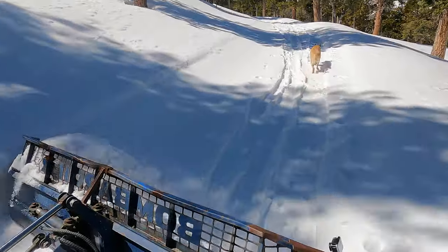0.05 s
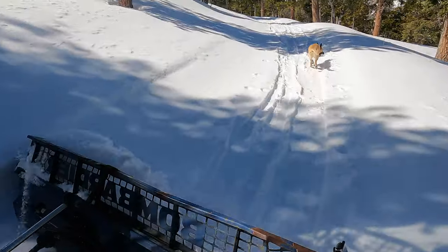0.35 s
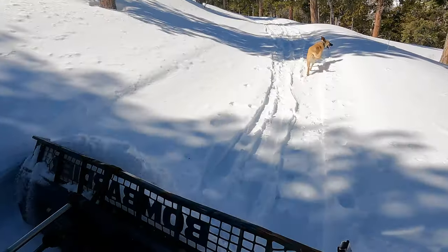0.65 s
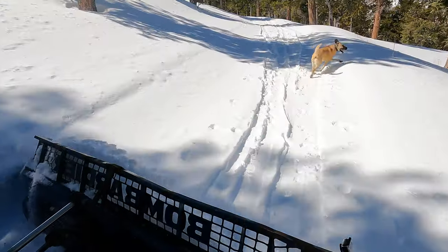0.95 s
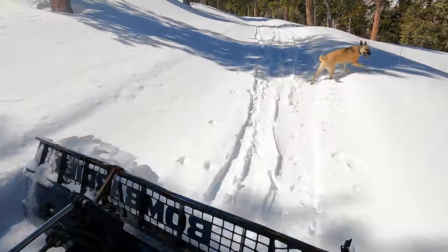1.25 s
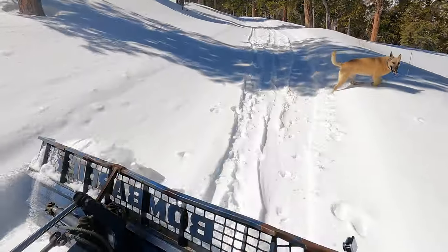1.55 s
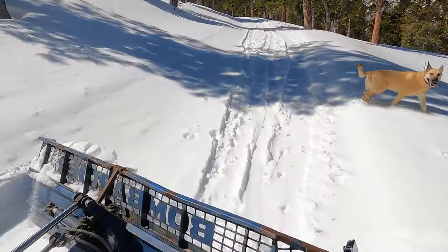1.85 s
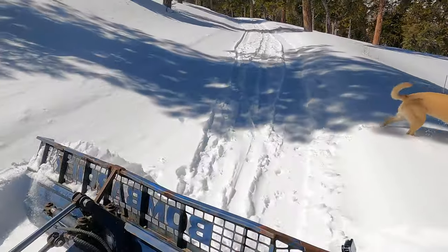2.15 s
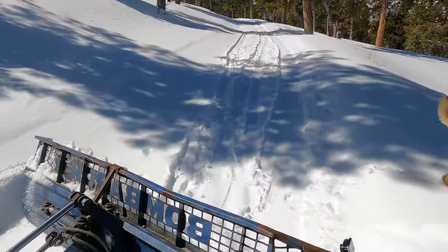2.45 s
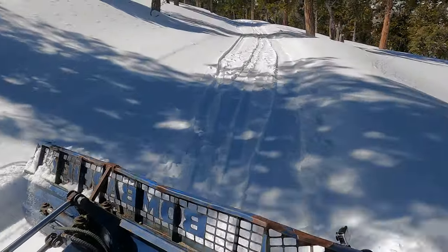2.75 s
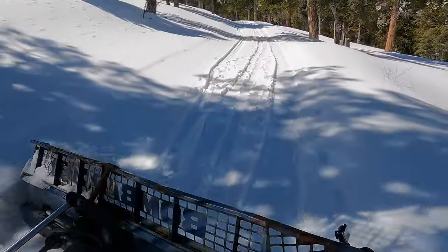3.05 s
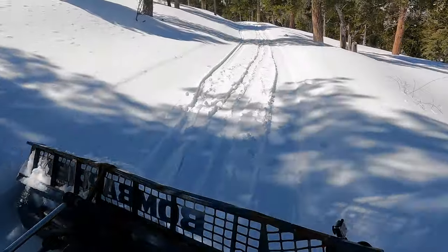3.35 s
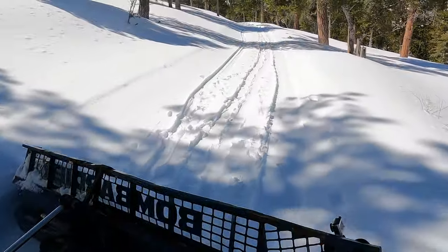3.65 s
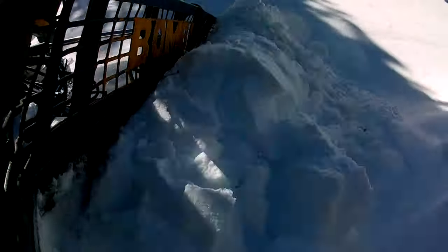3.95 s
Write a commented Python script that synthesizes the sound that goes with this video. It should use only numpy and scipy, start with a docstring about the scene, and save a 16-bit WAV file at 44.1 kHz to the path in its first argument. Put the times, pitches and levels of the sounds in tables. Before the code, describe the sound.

A tracked snow vehicle drones and clatters along, ending in a brief, loud, distorted throb.

```python
"""A snowy trail, on board a crawling snowcat. The exhaust drones at the firing rate, valves and injectors
clatter, gears whine and the engine covers ring. Track cleats drum over the sprockets and shake the
chassis, wheels squeak, loose steel clinks, and snow hisses and cracks under the tracks.
Near the end the sound cuts to a spot right beside the track, where a low throb, churning and creaking
snow overload a mono microphone."""
import sys
import numpy as np
from scipy import signal
from scipy.fft import rfft, irfft
from scipy.io import wavfile
from scipy.ndimage import uniform_filter1d, map_coordinates

SR = 44100
rng = np.random.default_rng(int(sys.argv[2]) if len(sys.argv) > 2 else 0)


def materialize(psi):
    """Save the field psi as 16-bit PCM at rate SR to the path in sys.argv[1].

    A 1-D psi becomes a single channel; in a 2-D psi each row is a channel.
    """
    bounded = np.clip(np.atleast_2d(psi).T, -1, 1)
    quanta = np.round(bounded * 32767).astype(np.int16)
    wavfile.write(sys.argv[1], SR, quanta)


N = 176400
T = np.arange(N) / SR
CYLINDERS = 6  # firings per four-stroke cycle


def exhaust(cycle):
    """The firing cylinders make a strong, steady drone with weaker tones around it."""
    # exhaust and body overtones (multiple of the engine cycle rate, level [dB])
    orders = [(7, -35.5), (9, -39), (10, -35), (12, -33), (14, -38.5), (16, -33.5), (17, -38), (18, -35.5),
              (22, -36.5), (26, -41), (33, -36)]
    drone = tones(cycle, [(CYLINDERS, -16)], waver_db=.44, smear_rad=.11)
    return drone + tones(cycle, orders, waver_db=2.5, smear_rad=.53)


def track_drum(cleat):
    """Cleats drum over the sprockets; the chassis rumbles and booms at twice their rate."""
    # drumming tones (multiple of the cleat rate, level [dB])
    drum_tones = [(1, -28), (3, -33.5)]
    # swells of the chassis boom (time [s], level [dB])
    boom_level = [(0, -36), (.12, -23), (.3, -17.5), (.44, -27), (1.0, -26), (1.4, -25.5), (1.9, -34),
                  (2.2, -19), (2.38, -34), (2.7, -29), (3.3, -26.5), (3.7, -26)]
    # chassis rumble spectrum (frequency [Hz], relative level [dB])
    rumble_eq = [(12, -8), (38, 1.5), (75, 3.5), (110, -0.5), (170, -6.5), (270, -4), (400, -10.5),
                 (800, -18.5)]
    drum = tones(cleat, drum_tones, waver_db=2.5, smear_rad=.077)
    boom = undb(curve(boom_level)) * tones(cleat, [(2, 0)], waver_db=.5, smear_rad=.2)
    rumble = stereo(colour(rng.standard_normal((2, N)), rumble_eq), spread=.13, pan_db=-1.3)
    return drum + boom + undb(-21) * rumble


def clatter(cycle, repeat_share=.34, knocks_per_cycle=10):
    """Valves and injectors rattle, partly alike on every cycle, in alternately strong and weak knocks."""
    # clatter spectrum (frequency [Hz], relative level [dB])
    clatter_eq = [(200, -6.5), (300, -9), (420, -5), (600, 0.5), (860, -3.5), (930, 0), (1150, 1.5),
                  (1500, -1.5), (1850, -1.5), (2100, -5.5), (2600, -5.5), (3000, -10.5), (3900, -18),
                  (7000, -26.5), (13000, -42)]
    # clatter envelope (time [s], level [dB])
    level = [(0, -23), (2.4, -22.5), (2.95, -22), (3.75, -22)]
    cycle_samples = int(1 / np.mean(np.diff(cycle)))
    loops = rng.standard_normal((2, cycle_samples))
    position = cycle % 1 * cycle_samples
    repeating = np.array([map_coordinates(loop, [position], mode="grid-wrap") for loop in loops])
    rattle = np.sqrt(repeat_share) * repeating + np.sqrt(1 - repeat_share) * rng.standard_normal((2, N))
    knock = 2 * np.pi * knocks_per_cycle * cycle
    limp = np.cos(knock / 2) + np.cos(1.5 * knock)  # accents every other knock
    pulse = np.exp(.17 * np.cos(knock) + .13 * limp)
    return stereo(colour(rattle * pulse, clatter_eq), spread=.47, pan_db=4) * undb(curve(level))


def beside_track(drive_db=8, ceiling_db=-7.8):
    """Throb, churning and snow creaks overload the microphone to a near-square wave; fuzz and ticks on top."""
    # pitch of the throb (time [s], frequency [Hz])
    throb_pitch = [(3.75, 86.04), (3.8, 79.1), (3.84, 65.2), (3.875, 70.4), (3.905, 87.3), (3.96, 89.7),
                   (4.0, 83.2)]
    # churning spectrum (frequency [Hz], relative level [dB])
    churn_eq = [(30, 1), (70, 2), (135, 7.5), (185, 2.5), (310, -3.5), (380, -13), (520, -8), (800, -21),
                (1020, -14.5), (1700, -28), (3000, -44), (13000, -76)]
    # churning envelope (time [s], level against the throb [dB])
    churn_level = [(3.76, 1.5), (3.81, -3.5), (3.85, -3), (3.9, 0), (3.925, -6.5), (3.95, -3.5), (4.0, -3)]
    # creaks of packed snow (time [s], peak before the overload [dB], pitch [Hz])
    creak_hits = [(3.761, -1, 950), (3.828, -10, 1100), (3.874, -7, 1000), (3.903, -5, 1050),
                  (3.942, -6, 680), (3.954, -5, 950), (3.968, -2.5, 980), (3.983, -7, 1350)]
    # close ticks of the track (time [s], relative level [dB], ring [Hz])
    tick_hits = [(3.791, -15, 3800), (3.815, -21, 3900)]
    throb = np.sqrt(2) * np.sin(2 * np.pi * turns(curve(throb_pitch)))
    churn = undb(curve(churn_level)) * colour(rng.standard_normal(N), churn_eq)
    creaks = sum(undb(db) * chirp(at, hz, half_s=.0045, glide=.12 * rng.standard_normal())
                 for at, db, hz in creak_hits)
    creaks *= 1 + .25 * walk(900)  # roughens the creaks
    fuzz = colour(rng.standard_normal(N), [(100, 0), (1200, -13), (3000, -10.5), (12000, -39)])
    ticks = steel(tick_hits, gain_db=-9, decay_s=.0018, width_hz=1400).mean(axis=0)
    overloaded = np.tanh(undb(drive_db) * (throb + churn + creaks))
    return undb(ceiling_db) * overloaded + undb(-43) * fuzz + ticks


def gears(cycle, whine_order=78):
    """Gear tones are locked to the engine; one swells into a clear whine."""
    # gear tones (multiple of the engine cycle rate, level [dB])
    orders = [(52, -44), (57, -41), (60, -42), (64, -44), (87, -39), (90, -44), (111, -43), (115, -44)]
    # swells of the lead whine (time [s], level [dB])
    whine_level = [(0, -43), (.55, -34), (1.4, -42), (2.4, -37), (2.82, -40), (2.86, -26.5), (2.93, -26),
                   (2.98, -38), (3.2, -37), (3.32, -29), (3.71, -26.5), (3.74, -39)]
    whine = undb(curve(whine_level)) * tones(cycle, [(whine_order, 0)], waver_db=.7, smear_rad=.3)
    whine *= 1 + .32 * walk(120)  # fast flutter
    mid, side = [tones(cycle, orders, waver_db=2.5, smear_rad=.8) for _ in range(2)]
    return stereo([whine + mid, side], spread=.5, pan_db=3)


def engine_covers(cycle, width_hz=40, decay_share=.2):
    """Covers are jolted a few times in each engine cycle and ring between the jolts."""
    # cover resonances (ring [Hz], jolts per cycle, level [dB])
    covers = [(1240, 4, -37.5), (1400, 3, -37), (1845, 2, -38)]
    out = 0
    for hz, jolts, db in covers:
        shake = rng.standard_normal((2, N)) * np.exp(-(jolts * cycle % 1) / decay_share)
        out += undb(db) * resonate(shake, hz, q=hz / width_hz)
    return stereo(out, spread=.47, pan_db=4)


def snow_hiss(cleat, flicker_db=1.29):
    """Each cleat presses a soft puff of hiss from the snow, with fine powder spraying wide to the left."""
    # spectrum of snow under the tracks (frequency [Hz], relative level [dB])
    hiss_eq = [(1500, -4), (3000, 3.5), (4000, -1), (5000, 3), (6000, -1), (7000, -3.5), (8000, -10),
               (9500, -15.5), (12300, -25), (13500, -43)]
    # hiss envelope (time [s], level [dB])
    level = [(0, -38.5), (.55, -35), (.61, -30), (.66, -34.5), (.9, -37.5), (1.47, -35), (2.0, -37.5),
             (2.095, -33.5), (2.16, -35.5), (2.5, -35.5), (3.03, -31.5), (3.2, -35.5), (3.5, -36),
             (3.72, -35)]
    puffs = 1 + .068 * np.cos(2 * np.pi * cleat)
    envelope = puffs * undb(curve(level) + flicker_db * walk(180))
    hiss = stereo(colour(rng.standard_normal((2, N)), hiss_eq), spread=.056, pan_db=0)
    powder = colour(rng.standard_normal((2, N)), [(6000, -10), (8500, -1), (12200, 3), (13500, -19)])
    return envelope * (hiss + undb(-20.5) * stereo(powder, spread=.73, pan_db=7))


def track_links():
    """Track links knock with a short clack; loose steel clinks brighter and rings longer."""
    # link knocks (time [s], relative level [dB], ring [Hz])
    clack_hits = [(0.0638, -20, 2920), (0.675, -23, 3240), (1.5049, -17.5, 3700), (1.513, -25, 4400),
                  (1.742, -20.5, 3600), (1.8657, -18, 3200), (2.0941, -18, 3060), (2.588, -22, 2840),
                  (2.7357, -23, 3040), (3.0057, -20, 3260)]
    # loose steel clinks (time [s], relative level [dB], ring [Hz])
    clink_hits = [(0.5341, -32, 8680), (0.6748, -26.5, 8750), (1.505, -24, 8490), (1.7403, -30, 8630),
                  (3.003, -24, 8680)]
    clacks = steel(clack_hits, gain_db=-.5, decay_s=.0038, width_hz=1300)
    return clacks + steel(clink_hits, gain_db=-7, decay_s=.0062, width_hz=530)


def wheel_squeaks(cleat, pitch_hz=2625, scatter=.014):
    """The wheels chirp at every cleat, each time at a slightly different pitch; a few chirps stand out."""
    # accented squeaks (time [s], peak [dB], pitch [Hz])
    accents = [(1.865, -27, 2520), (2.708, -27, 2580), (2.859, -28, 2620), (2.938, -27, 2610),
               (3.025, -25.5, 2650), (3.463, -24.5, 2600)]
    passes = T[1:][np.diff(np.floor(cleat)) > 0]
    chance = rng.standard_normal((len(passes), 2))
    faint = [(at, -32.5 + 2 * loud, pitch_hz * (1 + scatter * pitch))
             for at, (loud, pitch) in zip(passes, chance)]
    out = sum(undb(db) * chirp(at, hz, half_s=.008, glide=scatter * rng.standard_normal() / 2)
              for at, db, hz in faint + list(accents))
    return stereo([out, out], spread=0, pan_db=7)


def snow_crumbs(count=150, pitch_hz=5060, decay_s=.0024):
    """Crumbs of icy snow crack under the tracks, each with its own pitch and size."""
    out = np.zeros(N)
    age = T[:SR // 50]
    starts = rng.integers(N - len(age), size=count)
    for start, (pitch, loud) in zip(starts, rng.standard_normal((count, 2))):
        hz = np.clip(pitch_hz * (1 + .13 * pitch), 1000, SR / 4)
        crack = resonate(rng.standard_normal(len(age)), hz, q=5)
        out[start:start + len(age)] += undb(-36 + 5.5 * loud) * np.exp(-age / decay_s) * crack
    return signal.sosfilt(signal.butter(2, 8000, fs=SR, output="sos"), out)


def steel(hits, gain_db, decay_s, width_hz):
    """Each steel contact is a short rattle that rings one resonance."""
    out = np.zeros((2, N))
    rattle = colour(rng.standard_normal((2, N)), [(2200, 16.5), (8800, -7.5), (12000, -25)])
    for start, db, hz in hits:
        age = T - start
        envelope = (age > 0) * np.exp(-np.abs(age) / decay_s)
        out += undb(db + gain_db) * envelope * resonate(rattle, hz, q=hz / width_hz)
    return stereo(out, spread=.27, pan_db=4.5)


def chirp(middle, hz, half_s, glide):
    """A short stick-slip tone that swells, glides by a share of its pitch and fades."""
    out = np.zeros(N)
    near = slice(*np.searchsorted(T, [middle - 4 * half_s, middle + 4 * half_s]))
    age = T[near] - middle
    swell = np.exp(-.5 * (age / half_s) ** 2)
    out[near] = swell * np.sin(2 * np.pi * hz * age * (1 + glide * age / half_s / 2))
    return out


def tones(phase, rows, waver_db, smear_rad):
    """Harmonics of one rotation from (multiple, level [dB]) rows, each wavering in level and phase."""
    out = 0
    for multiple, db in rows:
        peak = np.sqrt(2) * undb(db + waver_db * walk(9))
        angle = 2 * np.pi * (round(multiple) * phase + rng.random())
        out += peak * np.sin(angle + smear_rad * walk(21.94))
    return out


def resonate(x, hz, q):
    """Ring one resonance with a sound; rms 1."""
    ring = signal.lfilter(*signal.iirpeak(hz, q, SR), x)
    return ring / np.std(ring)


def colour(x, points):
    """EQ a sound by (frequency [Hz], level [dB]) points, rolling off past both ends; rms 1."""
    hz, db = np.array(points).T
    f = np.maximum(np.fft.rfftfreq(N, 1 / SR), 1)
    rolloff = np.minimum(f / hz[0], 1) ** 2 * np.minimum(hz[-1] / f, 1) ** 2
    gain = undb(np.interp(np.log(f), np.log(hz), db))
    y = irfft(rfft(x) * rolloff * gain, N)
    return y / np.std(y)


def stereo(pair, spread, pan_db):
    """Left and right from a mid and side pair; positive pan leans left."""
    mid, side = pair[0], spread * pair[1]
    return np.array([(mid + side) * undb(pan_db / 2), (mid - side) * undb(-pan_db / 2)])


def walk(rate):
    """Smooth random wander with a spread near 1."""
    k = int(SR / rate)
    steps = np.repeat(rng.standard_normal(N // k + 2), k)[rng.integers(k):]
    return np.sqrt(2) * uniform_filter1d(uniform_filter1d(steps, k), k)[:N]


def undb(db):
    """Decibels to gain."""
    return 10 ** (np.asarray(db) / 20)


def curve(rows):
    """Straight lines through (time [s], value) rows."""
    return np.interp(T, *np.array(rows).T)


def turns(hz):
    """Cycles completed at a changing rate."""
    return np.cumsum(hz) / SR


def scene(cut_s=3.758, fade_s=.005):
    """The ride on board, driven by engine and track speed, then the cut to the trackside."""
    # engine speed (time [s], firing rate [Hz])
    firing_rate = [(0.0, 97), (0.5, 95.8), (1.7, 96.4), (2.65, 96.5), (2.78, 95), (3.25, 95.6), (3.4, 94.5),
                   (3.7, 94.1)]
    # track speed (time [s], cleat rate [Hz])
    cleat_rate = [(0, 29), (1.5, 27.6), (2.8, 25.6), (3.7, 24.5)]
    cycle = turns(curve(firing_rate) * (1 + .001996 * walk(10)) / CYLINDERS)
    cleat = turns(curve(cleat_rate) * (1 + .0087 * walk(4.2)))
    links = track_links()
    engine = exhaust(cycle) + gears(cycle) + clatter(cycle) + engine_covers(cycle)
    tracks = track_drum(cleat) + snow_hiss(cleat) + wheel_squeaks(cleat) + snow_crumbs() + links
    trackside = np.clip((T - cut_s) / fade_s + .5, 0, 1)
    return (1 - trackside) * (engine + tracks) + trackside * beside_track()


def record(dry):
    """A steep low-pass takes off the top octave's air."""
    return signal.sosfilt(signal.ellip(8, .2, 70, 13400, fs=SR, output="sos"), dry)


dry = scene()
out = record(dry)
materialize(out)
```